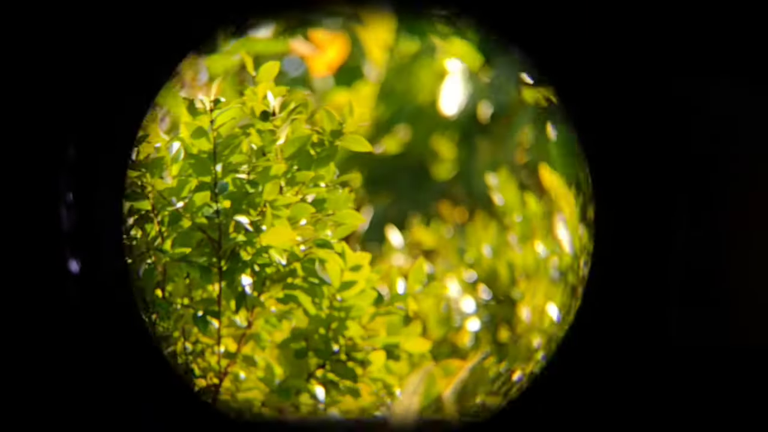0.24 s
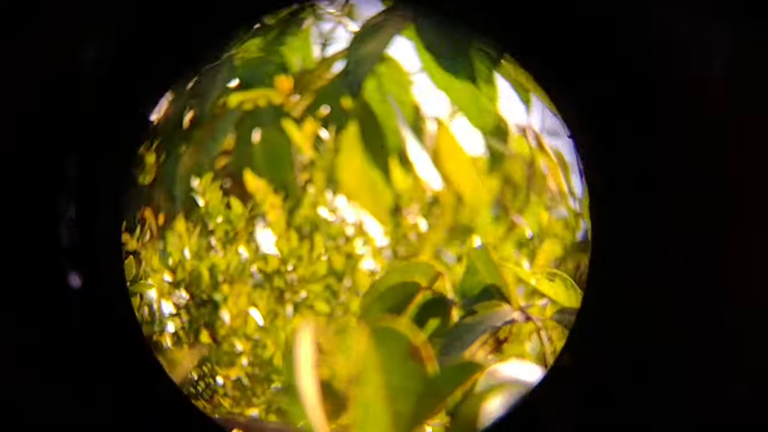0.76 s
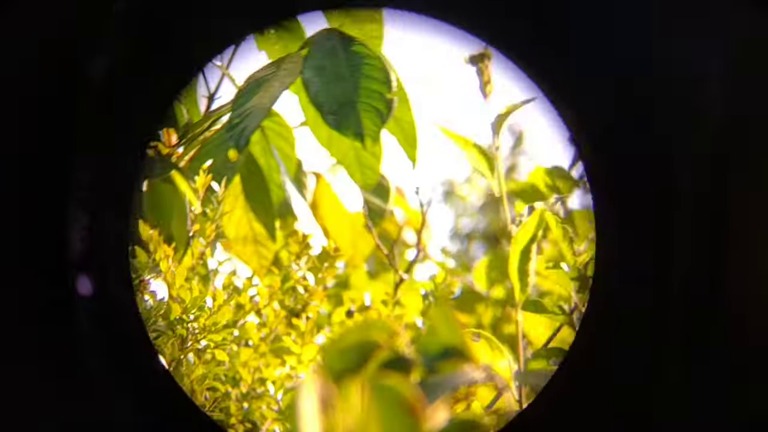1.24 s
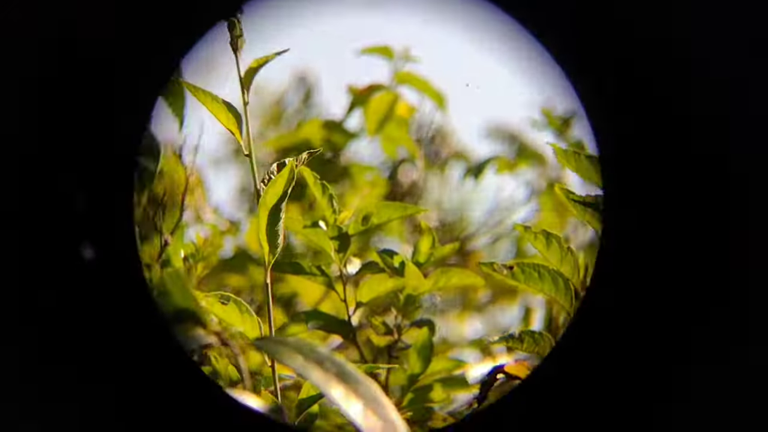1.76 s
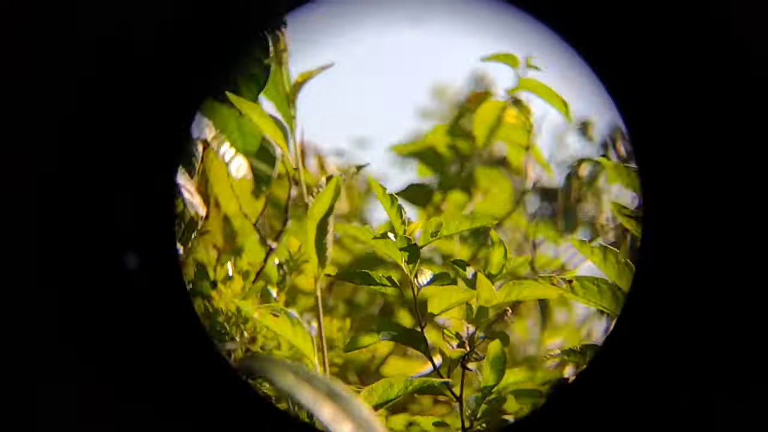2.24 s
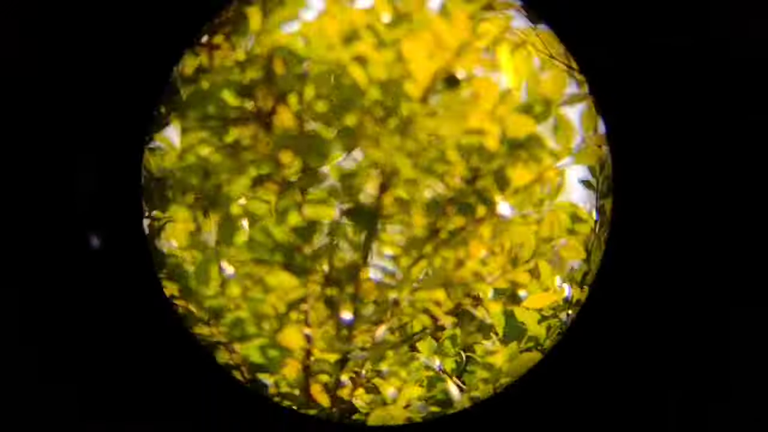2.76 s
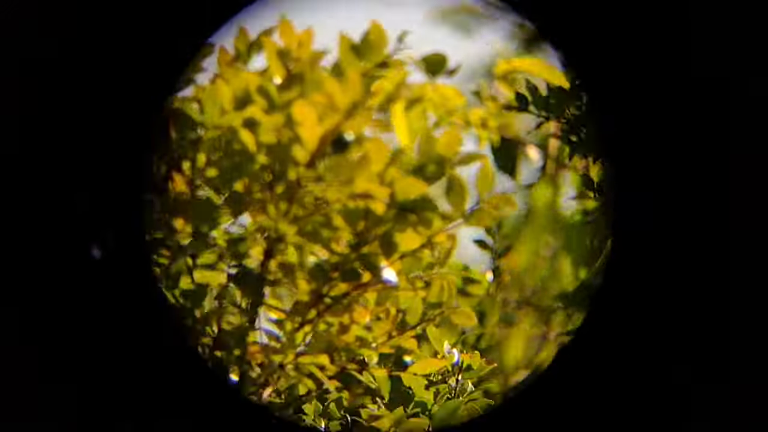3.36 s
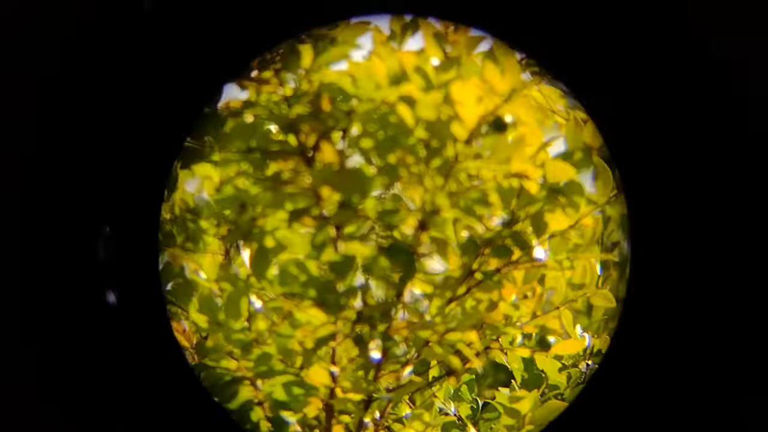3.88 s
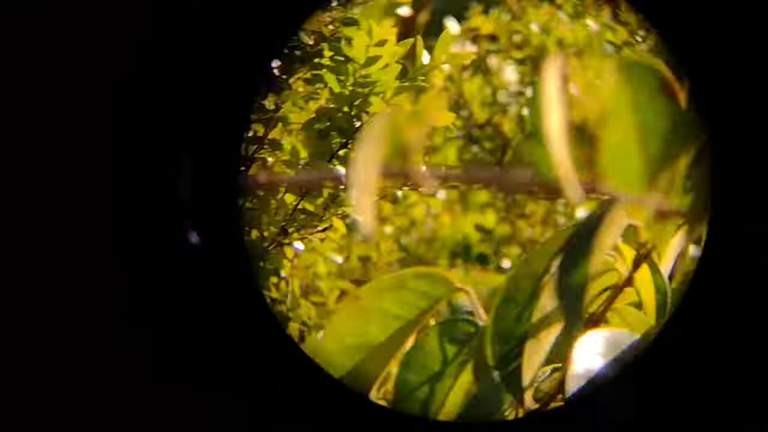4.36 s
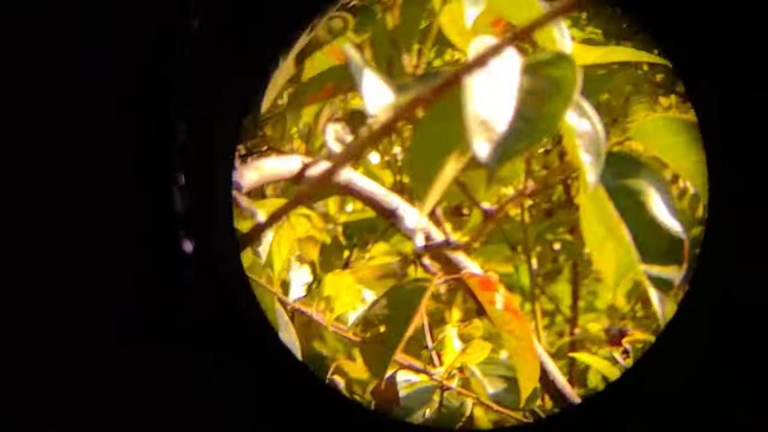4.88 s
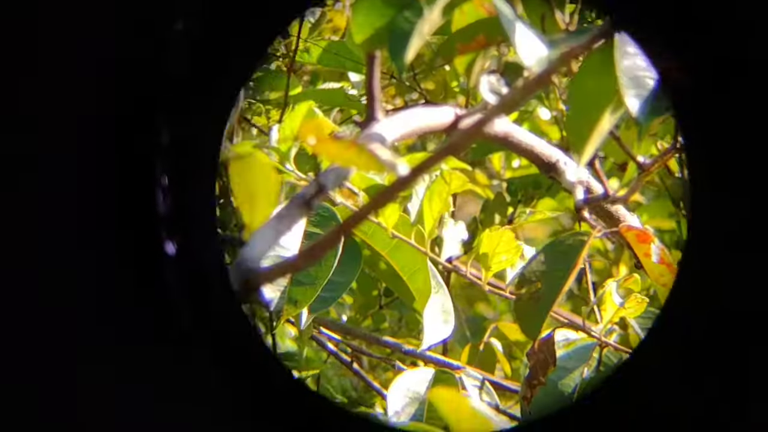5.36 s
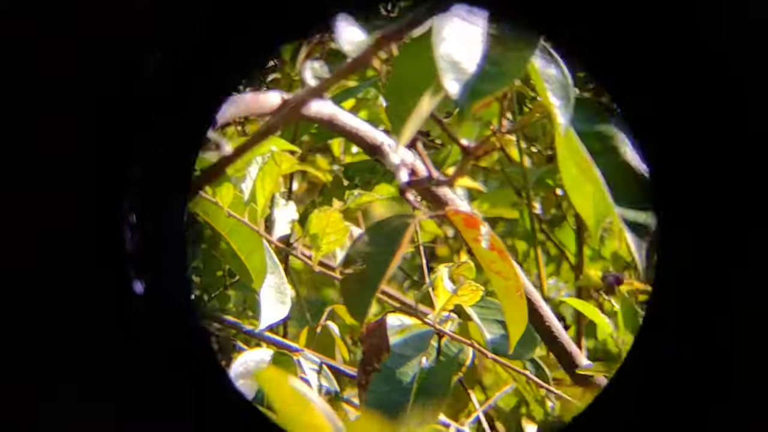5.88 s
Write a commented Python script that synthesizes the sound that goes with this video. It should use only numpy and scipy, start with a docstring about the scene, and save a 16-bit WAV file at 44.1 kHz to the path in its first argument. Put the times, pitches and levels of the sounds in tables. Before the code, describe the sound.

Quick, raspy, whistling squeals from one close bird give way to the hoarse chatter of a flock in a thicket.

```python
"""Chachalacas in a thicket, heard through two small microphone ports over faint background noise.
From the start a bird close by squeals four or five times a second: its syrinx opens thin, breaks
into a chaotic rasp and clears to a falling whistle. Near 2.7 s a far songbird chips once. From three
seconds on, lower voices take over with a quick hoarse chatter, the rest of the flock behind them.
The foliage gives every call a short echo, and the ports cut notches into its colour."""
import sys
import numpy as np
from scipy import signal
from scipy.fft import rfft, irfft, next_fast_len
from scipy.io import wavfile
from scipy.ndimage import uniform_filter1d, map_coordinates

SR = 44100
rng = np.random.default_rng(int(sys.argv[2]) if len(sys.argv) > 2 else 0)


def waveform_to_disk(signal):
    """Save audio, clipped to [-1, 1], as 16-bit WAV at the path in sys.argv[1]."""
    frames = np.transpose(np.atleast_2d(signal))
    scaled = np.clip(frames, -1, 1) * 32767
    samples = np.round(scaled).astype(np.int16)
    wavfile.write(sys.argv[1], SR, samples)


N = 269451
TIME = np.arange(N) / SR


def amp(db):
    return 10 ** (np.asarray(db) / 20)


def between(low, high, share):
    return low + (high - low) * share


def along(points, hz):
    """Read (hz, value) points on a log frequency axis."""
    knot_hz, values = np.transpose(points)
    return np.interp(np.log(hz + 1), np.log(knot_hz + 1), values)


def joined(knots):
    """One value per sample from (time_s, value) knots."""
    times, values = np.transpose(knots)
    return np.interp(TIME, np.maximum.accumulate(times), values)


def wobble(rate):
    """A smooth random curve, rate knots a second."""
    return map_coordinates(rng.standard_normal(int(N * rate / SR) + 4), [TIME * rate])


def filtered(x, response):
    """x through a complex response of frequency."""
    size = next_fast_len(N + SR // 2)
    return irfft(rfft(x, size) * response(np.fft.rfftfreq(size, 1 / SR)), size)[..., :N]


def coloured(x, spectrum):
    """x shaped by (freq_hz, gain_db) points, at rms 1."""
    shaped = filtered(x, lambda hz: amp(along(spectrum, hz)))
    return shaped / np.sqrt(np.mean(shaped ** 2) + 1e-20)


def levelled(x, size):
    """x with its slow level evened out to 1."""
    power = uniform_filter1d(uniform_filter1d(x ** 2, size), size)
    return x / np.sqrt(np.abs(power) + 1e-6)


# Colour of the air in the thicket: freq_hz, gain_db
AIR_COLOUR = [(25, -14), (40, -14), (60, -6.5), (110, 0.5), (200, -2.5), (450, -1), (900, 0), (2000, -11),
              (5000, -17.5), (10000, -17.5), (15500, -30)]
# Background noise, rising in the second half as the recorder's gain comes up: time_s, relative_level_db
BACKGROUND_LEVEL = [(0.0, -67.5), (2.16, -73), (4.76, -64), (6.11, -63)]
def air(gain_db=6.0, spread=.11, right_db=3.0):
    """Faint outdoor noise all round the microphone, nearly in mono and a little louder on the right."""
    mid, side = coloured(rng.standard_normal((2, N)), AIR_COLOUR)
    stereo = np.array([mid + spread * side, (mid - spread * side) * amp(right_db)])
    return amp(joined(BACKGROUND_LEVEL) + gain_db) * stereo


def far_songbird(peak_s=2.67, pitch_hz=8100, width_s=.022, level_db=-60):
    """One thin, high chip from far off."""
    phase = 2 * np.pi * np.cumsum(pitch_hz * (1 + .05 * wobble(500))) / SR
    return amp(level_db) * np.exp(-((TIME - peak_s) / width_s) ** 2) * np.sin(phase)


# The rest of the flock, deeper in the thicket: time_s, level_db
FLOCK_LEVEL = [(2.95, -88.5), (3.15, -44.5), (3.8, -49), (4.7, -50), (5.55, -42.5), (6.1, -47.5)]
# Rasp of a hoarse throat, in the far flock and the chatter: freq_hz, gain_db
RASP_COLOUR = [(400, -67), (1300, -1.5), (2300, -1.5), (2900, 5), (3500, 2), (4400, -9), (5000, -12),
               (6300, -7.5), (7300, -18.5), (8500, -13.5), (9800, -26), (11200, -32), (12200, -50),
               (15500, -48.5)]
def far_flock(flicker_db=2):
    """At a distance many rasps blur into one restless band."""
    level_db = joined(FLOCK_LEVEL) + flicker_db * wobble(18)
    return amp(level_db) * coloured(rng.standard_normal(N), RASP_COLOUR)


# Throat resonances of a hoarse bird: freq_hz, gain_db
HOARSE_THROAT = [(200, -65), (480, -21), (630, 2.5), (850, 1.5), (1100, -7), (1400, 0.5), (1800, -21),
                 (2200, 6.5), (2700, -43), (4000, -51)]
def hoarse_calls(calls, start_hz=880, fall=.06, jitter=.15, growl=.47, throb_db=2, flutter_db=1.54):
    """A low, very unsteady voice that sinks through each call, with a rasp gated by its cycles."""
    soft_db, loud_db = -41, -33
    windpipe_hz, loss_db_per_hz = 752, .022
    pitch, tone_db, rasp_db, rough = [], [], [], []
    for peak, rise, hz, call_db in calls:
        # a louder call is rougher and takes longer to fall
        effort = np.clip((call_db - soft_db) / (loud_db - soft_db), 0, 1)
        harsh = between(.4, .99, effort)
        start, end = peak - max(rise, .02), peak + between(.0385, .058, effort)
        # the low tone fades as the pitch climbs above the windpipe's resonance
        ring_db = -34.9 - loss_db_per_hz * max(hz - windpipe_hz, 0)
        swell = [(start - .008, -70), (start + .0035, -16.5), (start + .011, -5), (peak - .005, 0),
                 (peak + .015, 0), (end, -14), (end + .03, -70)]
        pitch += [(start, start_hz), (peak, hz), (end, hz * (1 - fall))]
        rough += [(start, harsh / 2), (peak, harsh), (end, harsh)]
        tone_db += [(s, ring_db + db) for s, db in swell]
        rasp_db += [(s, call_db + db + .37) for s, db in swell]
    rough = joined(rough)
    unsteady = rough * (jitter * wobble(700) + .07 * wobble(110))
    phase = 2 * np.pi * np.cumsum(joined(pitch) * (1 + unsteady)) / SR
    breath = 1.2 * rough * rng.standard_normal(N)
    beat = 1 + growl * rough * np.cos(phase / 3)  # when rough, every third cycle is stronger
    harmonics = sum(np.sin(k * phase) for k in range(1, 6))
    tone = coloured(beat * harmonics + breath, HOARSE_THROAT)
    tone *= amp(throb_db * rough * np.tanh(wobble(140)))
    rasp = coloured(rng.standard_normal(N) * (1 + .72 * np.cos(phase)), RASP_COLOUR)
    flutter = amp(flutter_db * rough * wobble(300))
    return flutter * (amp(joined(tone_db)) * tone + amp(joined(rasp_db)) * rasp)


# Hoarse calls from among the leaves: peak_s, rise_s, pitch_hz, relative_level_db
CHATTER_CALLS = [(3.125, 0.02413, 877, -42), (3.36, 0.03485, 880, -38.5), (3.465, 0.0499, 839.3, -32.5),
                 (3.575, 0.027, 752, -33), (3.68, 0.0381, 698, -31), (3.82, 0.0299, 722, -32),
                 (3.94, 0.0346, 710, -32), (4.01, .04, 823.6, -39), (4.06, 0.0357, 729.6, -30),
                 (4.2, 0.04536, 836.4, -35), (4.25, 0.02805, 699.7, -33), (4.375, 0.0692, 699, -32.5),
                 (4.495, 0.0515, 750, -31.5), (4.65, 0.0614, 730.3, -32.5), (4.8, 0.06706, 727.4, -34),
                 (4.91, .048, 849, -36), (4.975, .045, 810, -41), (5.05, 0.02772, 813, -33.5),
                 (5.16, 0.035, 752, -31), (5.325, 0.0423, 738, -32.5), (5.44, 0.0343, 725.3, -34),
                 (5.51, .045, 810, -36.5), (5.585, 0.0521, 696.4, -36.5), (5.64, 0.0389, 880, -39.5),
                 (5.69, 0.0299, 860.7, -36), (5.76, 0.0361, 750, -27.5), (5.9, 0.0532, 720.4, -33),
                 (5.935, 0.0288, 880.6, -31), (6.07, .05, 748.4, -31)]
def chatter():
    """Hoarse calls, some higher and some lower, in quick succession and often overlapping."""
    # alternate rows are played separately so that neighbouring calls can overlap
    return hoarse_calls(CHATTER_CALLS[::2]) + hoarse_calls(CHATTER_CALLS[1::2])


def pips(pitch_hz=850, width_s=.00272, gap_s=.039, level_db=-46.5, fade_db_per_s=5):
    """A soft low note, a few cycles long, follows each near squeal, weaker as the bout goes on."""
    out = np.zeros(N)
    for start, rasp_s, whistle_s, *_ in NEAR_SQUEALS:
        squeal_end = start + OPENING_S + rasp_s + whistle_s
        t = TIME - (squeal_end + gap_s) - width_s
        sounding = np.abs(t) < 4 * width_s
        t = t[sounding]
        note = np.sin(2 * np.pi * pitch_hz * t) + .5 * np.sin(np.pi * pitch_hz * t)
        out[sounding] += amp(level_db - fade_db_per_s * start) * np.exp(-(t / width_s) ** 2) * note
    return out


OPENING_S = .024  # every squeal opens thinly for the same time
# The near bird's throat starts pinched and relaxes: time_s, pinch_share
THROAT_PINCH = [(0.1, 1), (0.8, 0.35), (1.4, 0.27), (2.0, 0), (3.0, 0.01), (3.5, 0)]
# Squeals close to the microphone:
# start_s, rasp_s, whistle_s, pitch_hz, fall_share, opening_db, rasp_db, whistle_db, roughness_share
NEAR_SQUEALS = [(0.071, .043, 0.044, 1977, 0.35, -26.5, -20, -22.5, 0.79),
                (0.281, .011, 0.077, 1911, .22, -22, -25, -17.5, 0.47),
                (0.489, .042, 0.059, 1982, .19, -21, -22, -16.5, .3),
                (0.706, 0.02, .07, 1909, 0.12, -25.5, -22, -17, .15),
                (0.921, 0.048, 0.044, 2143, 0.17, -26.5, -20, -17, .89),
                (1.152, .034, 0.047, 2162, 0.13, -29, -21, -16, 0.86),
                (1.374, 0.036, 0.047, 2075, 0.062, -29.5, -20.5, -16.5, 0.62),
                (1.588, 0.038, 0.053, 2201, 0.13, -30, -24, -16, 0.93),
                (1.817, .051, 0.035, 2167, 0.1, -23.5, -23, -18, 0.75),
                (2.036, 0.04, .041, 2164, .13, -23, -24, -16.5, 0.72),
                (2.262, 0.043, 0.04, 2072, 0.1, -21.5, -24, -16.5, 0.24),
                (2.492, 0.034, 0.044, 2167, .09, -23.5, -24.5, -14.5, .84),
                (2.716, 0.036, .061, 2170, 0.12, -30.5, -25.5, -14.5, 0.87),
                (2.952, 0.032, 0.057, 2074, .05, -21.5, -23, -14, 0.75),
                (3.166, 0.0081, .073, 2268, .12, -30.5, -32, -15.5, .5),
                (3.402, 0.0061, 0.049, 2175, 0.055, -38, -33, -17.5, 0.28),
                (3.637, 0.021, .053, 2103, 0, -29.5, -22, -15.5, 0.94)]
def squeal_gestures(jump_s=.0022, onset_s=.0054, release_s=.034, clean=.07015, frayed=.29):
    """Pitch, level, roughness and period doubling as the syrinx jumps from opening to rasp to whistle."""
    pitch, level, rough, doubling = [], [], [], []
    for start, rasp_s, whistle_s, hz, fall, opening_db, rasp_db, whistle_db, harsh in NEAR_SQUEALS:
        rasp = start + OPENING_S
        clear = rasp + max(rasp_s, 3 * jump_s)
        end = clear + whistle_s
        pinch = np.interp(start, *np.transpose(THROAT_PINCH))
        # the opening hooks down onto its pitch; a weak or pinched one slides up from below
        hook = between(1.4, 1, np.sqrt(pinch))
        slide = 1 - np.clip(.045 * (-31 - opening_db), 0, .6) - .08 * pinch
        swell_db = 5.5 * (1 - pinch)  # the rasp swells unless the throat is pinched
        low_hz = hz * (1 - fall)
        pitch += [(start - jump_s, hz * hook * slide), (start + .3 * OPENING_S, hz * .98 * slide),
                  (rasp - jump_s, hz * np.sqrt(slide)), (rasp, hz * 1.24), (clear - jump_s, hz * 1.07),
                  (clear + jump_s, hz * 1.02), (clear + .6 * whistle_s, low_hz), (end, low_hz * .92)]
        level += [(start - onset_s, -90), (start + jump_s / 2, opening_db - 15 + 5 * pinch),
                  (rasp - jump_s, opening_db),
                  (rasp + jump_s, rasp_db - swell_db / 2), (clear - jump_s, rasp_db + swell_db / 2),
                  (clear + jump_s, whistle_db), (clear + .41 * whistle_s, whistle_db - 2.5),
                  (clear + .79 * whistle_s, whistle_db - 10.5), (end, -42), (end + release_s, -100)]
        rough += [(start, .54 * harsh), (start + OPENING_S / 2, 2 * clean), (rasp - jump_s, 2 * clean),
                  (rasp + jump_s, .5 * harsh), (clear - jump_s, harsh),
                  (clear + jump_s, clean), (clear + whistle_s / 2, clean),
                  (clear + .6 * whistle_s, frayed * (1 + pinch / 2)), (end, frayed)]
        doubling += [(start, -16), (rasp - jump_s, -15), (rasp + jump_s, 0), (clear - jump_s, 0),
                     (clear + jump_s, -12), (clear + whistle_s / 2, -12), (end, 2), (end + release_s, 2)]
    level_db = uniform_filter1d(joined(level), size=64)
    return joined(pitch), level_db, np.clip(joined(rough), 0, 1), joined(doubling)


# The near bird's throat, relaxed and pinched: freq_hz, gain_db
OPEN_THROAT = [(300, -42), (750, 11), (1200, -26), (1600, 5.5), (2100, 4), (2800, -7), (3500, -5.5),
               (4050, -28), (4700, -23.5), (5500, -21), (7000, -51.5), (9000, -18.5), (10500, -38),
               (12500, -90)]
PINCHED_THROAT = [(300, -50), (800, -18), (1250, -10.5), (1700, -3), (2100, 1), (2600, -5), (3450, 4),
                  (3850, -16), (4400, -39.5), (5600, -12), (7000, -27.5), (9000, -25), (12000, -42)]
# Hiss at its beak: freq_hz, gain_db
HISS_COLOUR = [(500, -10), (1500, 7.5), (3300, -5), (4200, -2), (5600, -15), (7000, -10), (8900, 6.5),
               (10200, -7.5), (11300, -31), (12000, -37.5), (15500, -43)]
# A dip near 4.5 kHz in the hiss of the early squeals: freq_hz, gain_db
EARLY_HISS_DIP = [(3900, 3), (4300, -18), (4750, -18), (5300, 0)]
def squeals(jitter=.15, lurch=.087, flutter_db=2, overtone_db=-4, hiss_db=-25.3, rough_hiss_db=9):
    """The syrinx swings cleanly, or doubles its period and turns chaotic; the throat shapes the tone."""
    hz, level_db, rough, doubling_db = squeal_gestures()
    pinch = np.clip(joined(THROAT_PINCH), 0, 1)
    # in chaos the cycles scatter, and the pitch lurches every few milliseconds
    unsteady = rough * (jitter * wobble(1800) + lurch * wobble(170)) + .018 * wobble(260)
    phase = 2 * np.pi * np.cumsum(hz * (1 + unsteady)) / SR
    # the moment of closing varies from cycle to cycle, which smears the overtones
    blurred = phase + .22 * (1 - .6 * pinch) * wobble(900)
    overtones = amp(overtone_db + 4.6 * wobble(120)) * sum(np.sin(k * blurred) for k in range(2, 6))
    # a pinched whistle holds its single period more firmly
    doubling = amp(doubling_db * (1 + .6 * pinch) + 3.74 * wobble(200))
    subharmonic = np.clip(1 - 1.5 * rough, 0, 1) * np.sin(phase / 2)
    half_partials = sum(np.sin((k - .5) * blurred) for k in range(2, 6))
    syrinx = np.sin(phase) + overtones + doubling * (subharmonic + half_partials)
    voice = between(coloured(syrinx, OPEN_THROAT), coloured(syrinx, PINCHED_THROAT), pinch)
    # the squeal is cut steeply below 800 Hz, which keeps it thin
    voice = filtered(voice, lambda f: 1 - 1 / (1 + (f / 800) ** 8))
    # the membranes can swing only so far, which keeps the peaks even
    voice = levelled(voice, size=96)
    full_hiss = coloured(rng.standard_normal(N), HISS_COLOUR)
    early_hiss = filtered(full_hiss, lambda f: amp(along(EARLY_HISS_DIP, f)))
    hiss = amp(hiss_db + rough_hiss_db * rough) * between(full_hiss, early_hiss, np.sqrt(pinch))
    level_db += flutter_db * np.sqrt(rough) * np.tanh(2 * wobble(500))
    return amp(level_db) * (voice + hiss)


# Echo of the leaves round the microphone: freq_hz, t60_s
LEAF_DECAY = [(300, 0.26), (2000, 0.22), (5000, 0.44), (10000, 0.27)]
def foliage(x, spread=.29, bright_db=7):
    """Leaves scatter a short tail, the treble most of all, a little different at each port."""
    hz, t, noise = signal.stft(rng.standard_normal((2, SR // 2)), SR, nperseg=256)
    colour_db = along([(2200, 0), (6000, bright_db)], hz)[:, None]
    decay_db = 60 * t / along(LEAF_DECAY, hz)[:, None]
    mid, side = signal.istft(noise * amp(colour_db - decay_db), SR, nperseg=256)[1]
    tail = np.array([mid + spread * side, mid - spread * side]) / np.linalg.norm(mid)
    delayed = np.pad(x, (300, 0))
    return signal.fftconvolve(delayed[None], tail, axes=1)[:, :N]


# Direction of the birds from the microphone: freq_hz, left_minus_right_db
BIRD_BALANCE = [(100, 4.5), (900, -4), (1400, 4), (1800, 4.5), (2200, 5.5), (2900, -4.5), (4200, -1.5),
                (5400, -7.5), (6600, -0.5), (8000, -10.5), (9200, 2), (12000, -5.5)]
def microphone_ports(x, left_hz=2570, right_hz=2370, depth=.92, ring=.42):
    """A reflection at each port cuts a row of notches, spaced differently left and right."""
    def response(hz):
        reflection = np.exp(-2j * np.pi * hz / np.array([[left_hz], [right_hz]]))
        comb = (1 - depth * reflection) / (1 - ring * reflection)
        return comb * amp(along(BIRD_BALANCE, hz) * np.array([[.5], [-.5]]))
    return filtered(x, response)


def scene(squeal_echo_db=-21, flock_echo_db=-8, chatter_db=-2):
    """From one spot in the thicket: the squeals almost dry, the flock with more echo, over the air."""
    high_calls = squeals() + pips() + far_songbird()
    flock = amp(chatter_db) * chatter() + far_flock()
    echo = amp(squeal_echo_db) * foliage(high_calls) + amp(flock_echo_db) * foliage(flock)
    return microphone_ports(high_calls + flock + echo) + air()


def record(dry, top_hz=15800):
    """The recorder keeps nothing above its band limit."""
    return filtered(dry, lambda hz: hz < top_hz)


dry = scene()
out = record(dry)
waveform_to_disk(out)
```